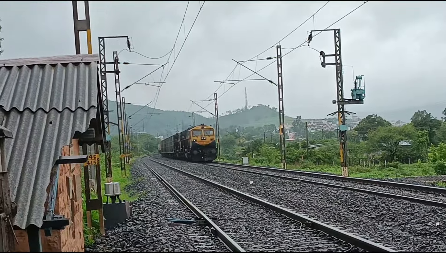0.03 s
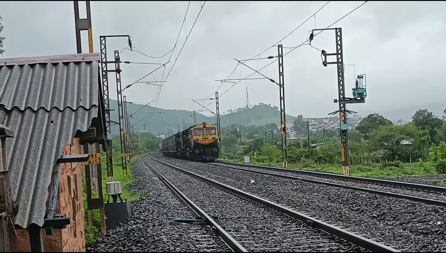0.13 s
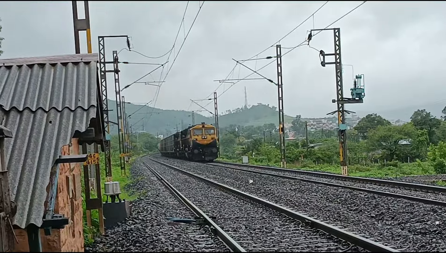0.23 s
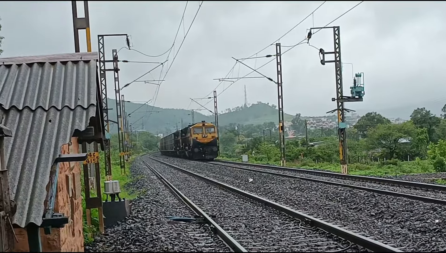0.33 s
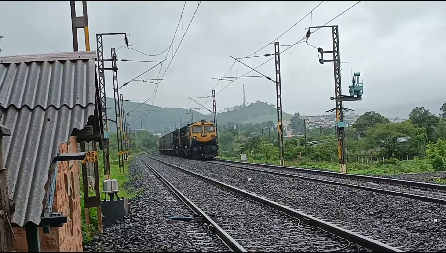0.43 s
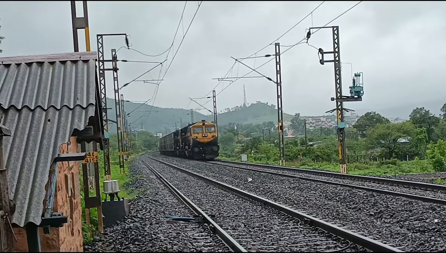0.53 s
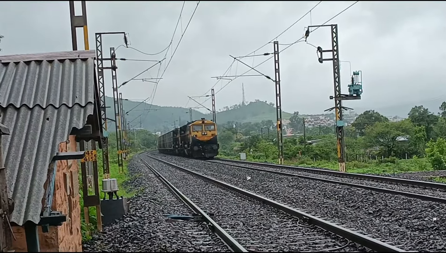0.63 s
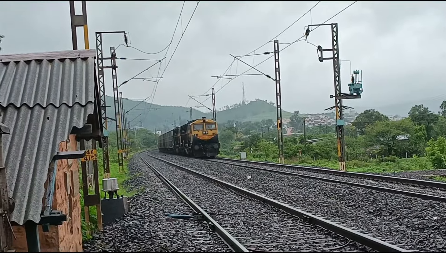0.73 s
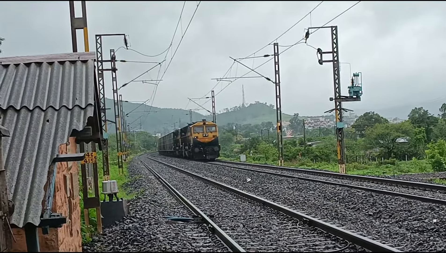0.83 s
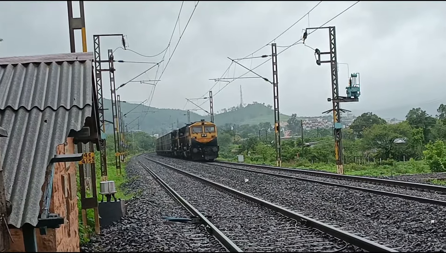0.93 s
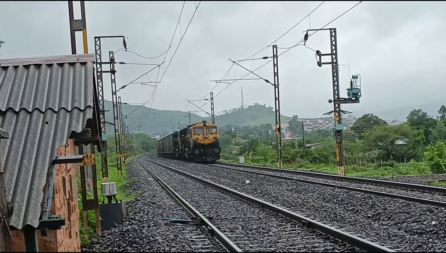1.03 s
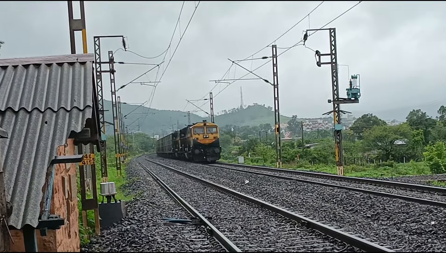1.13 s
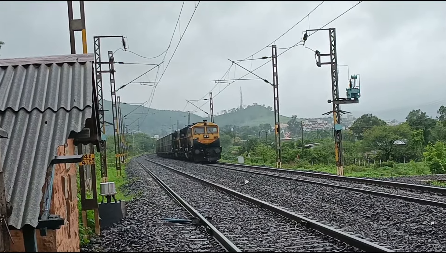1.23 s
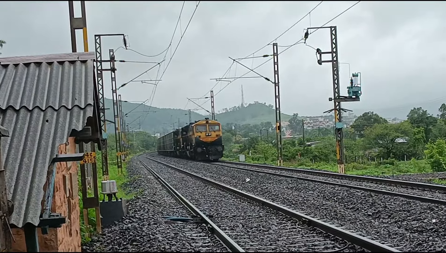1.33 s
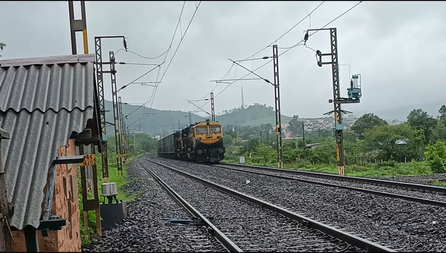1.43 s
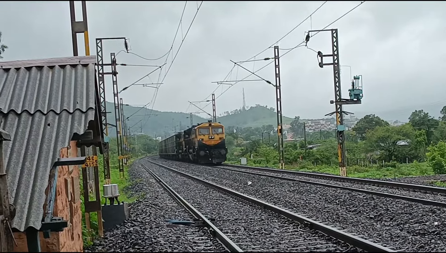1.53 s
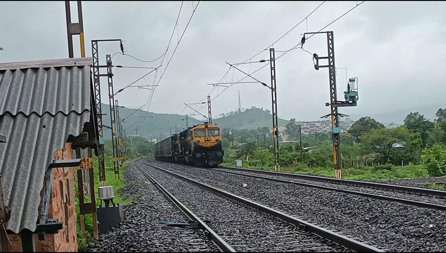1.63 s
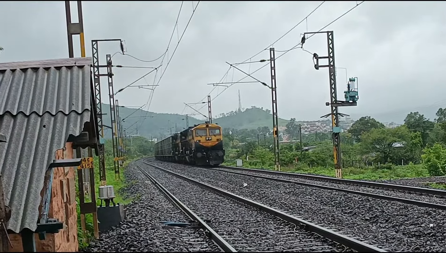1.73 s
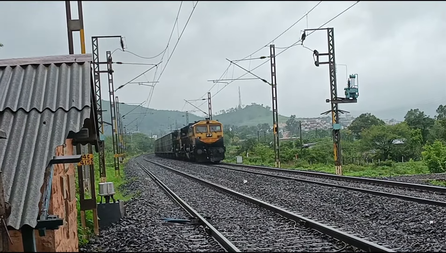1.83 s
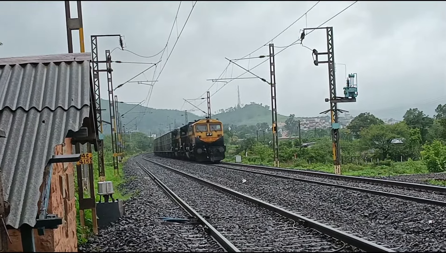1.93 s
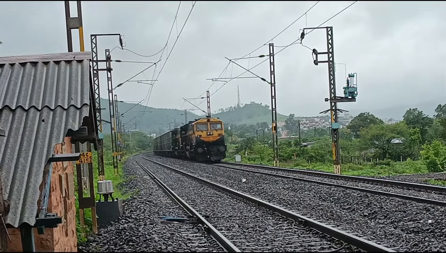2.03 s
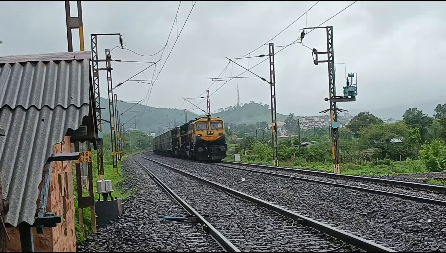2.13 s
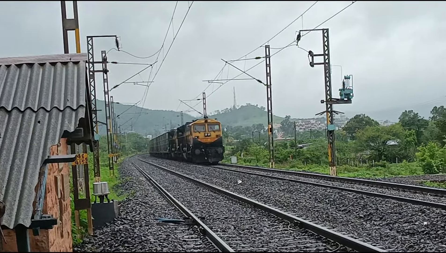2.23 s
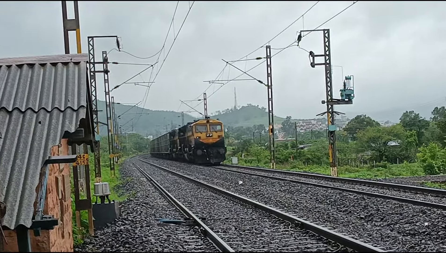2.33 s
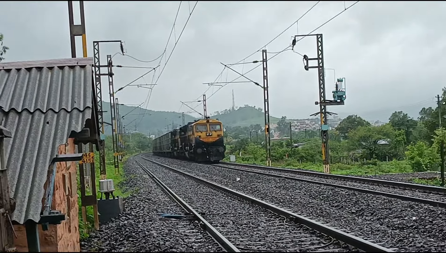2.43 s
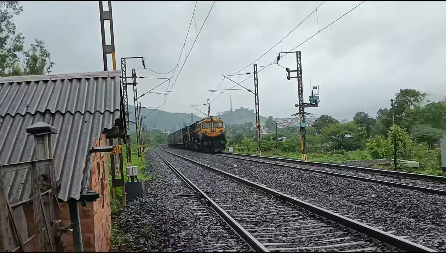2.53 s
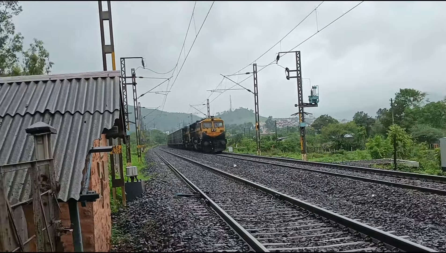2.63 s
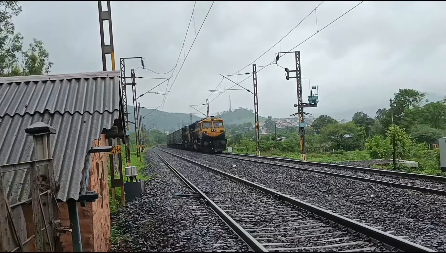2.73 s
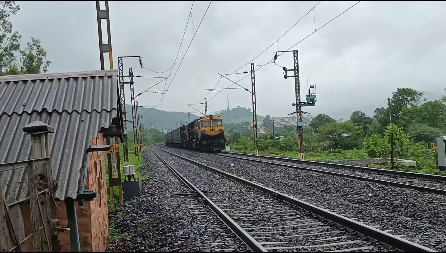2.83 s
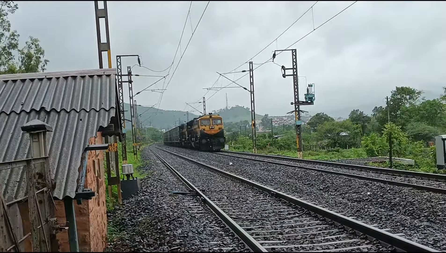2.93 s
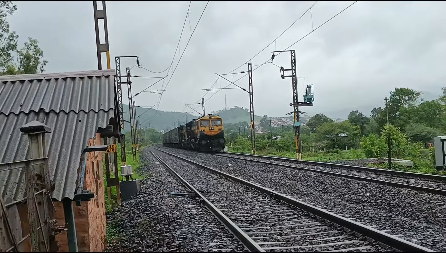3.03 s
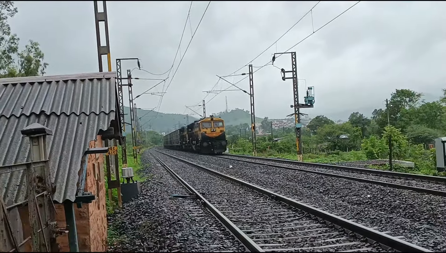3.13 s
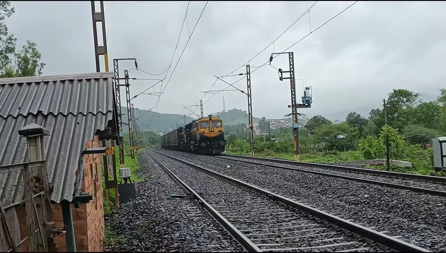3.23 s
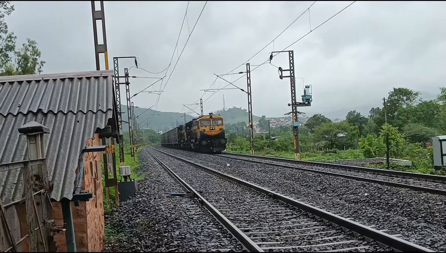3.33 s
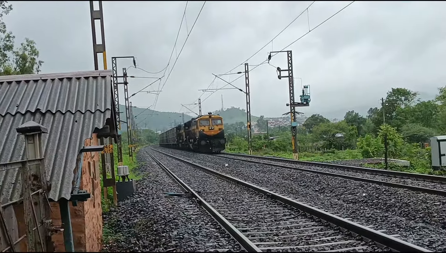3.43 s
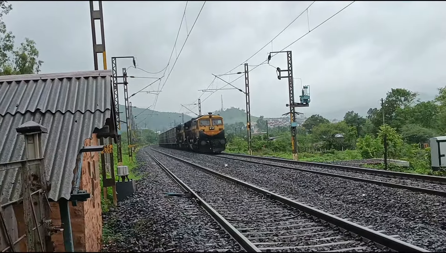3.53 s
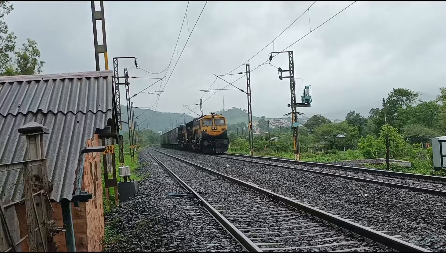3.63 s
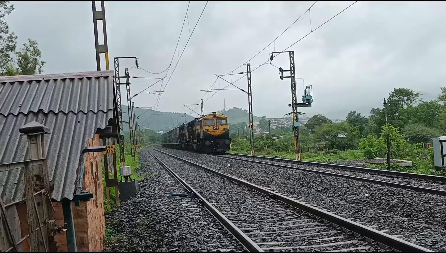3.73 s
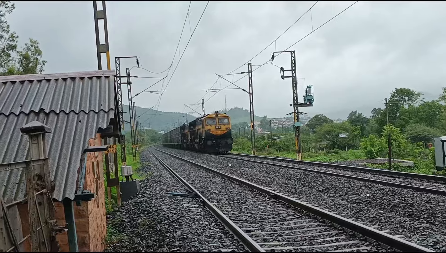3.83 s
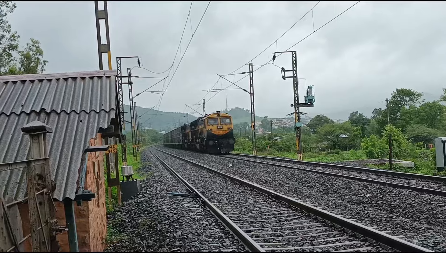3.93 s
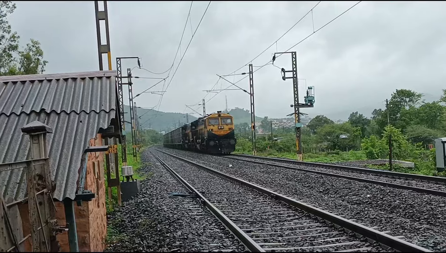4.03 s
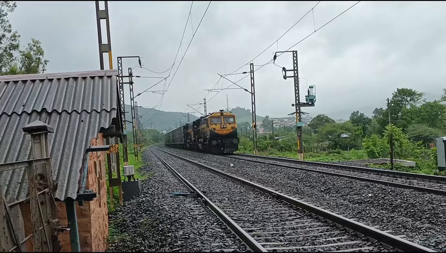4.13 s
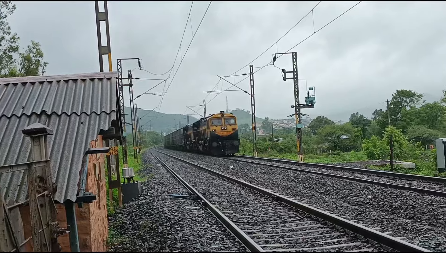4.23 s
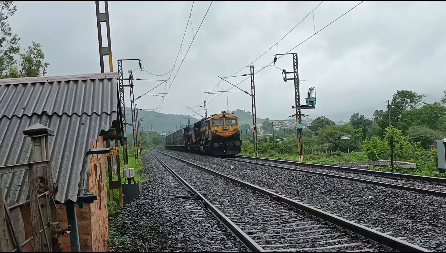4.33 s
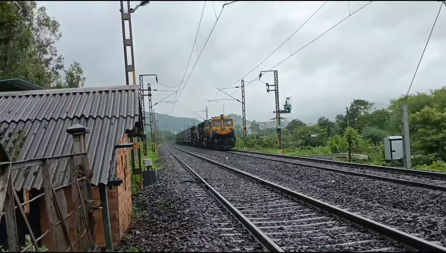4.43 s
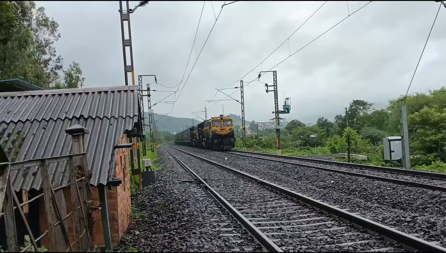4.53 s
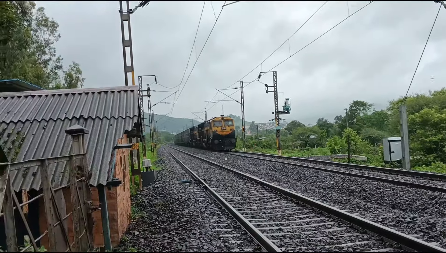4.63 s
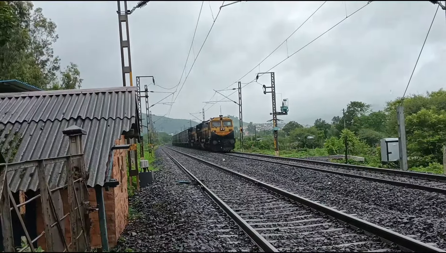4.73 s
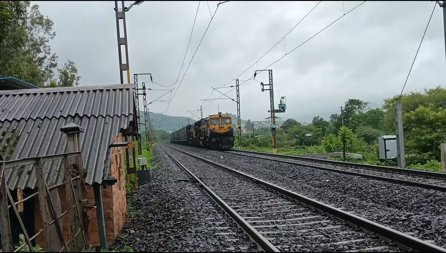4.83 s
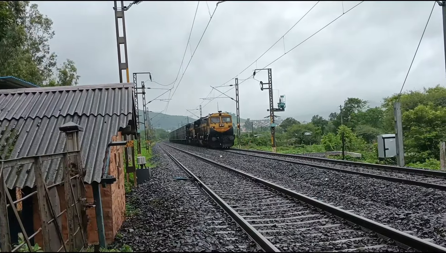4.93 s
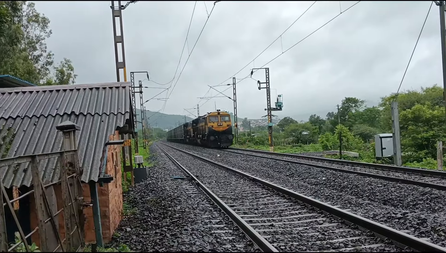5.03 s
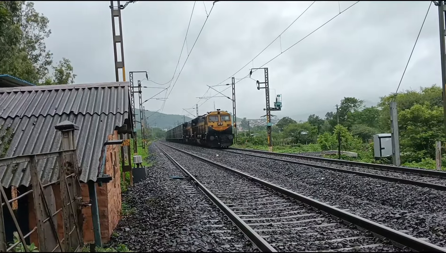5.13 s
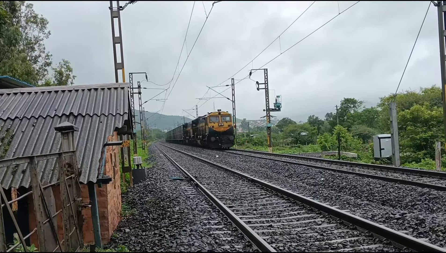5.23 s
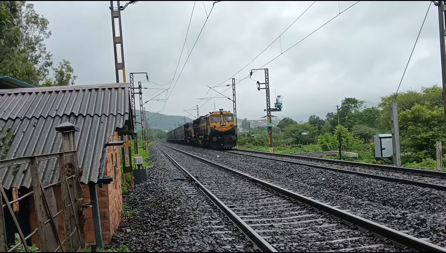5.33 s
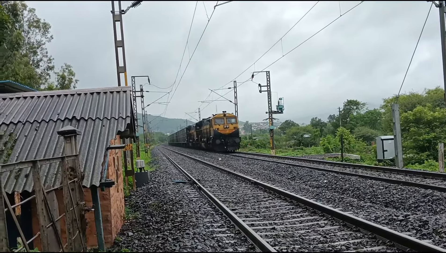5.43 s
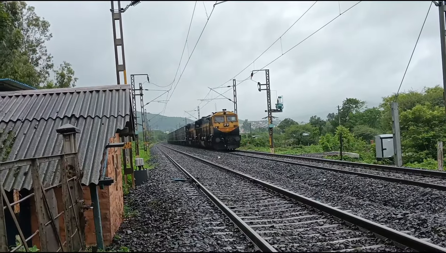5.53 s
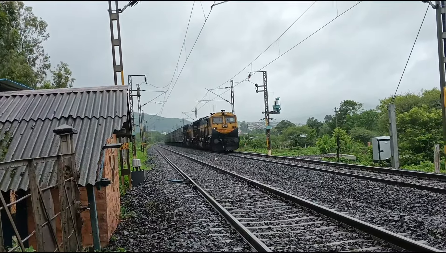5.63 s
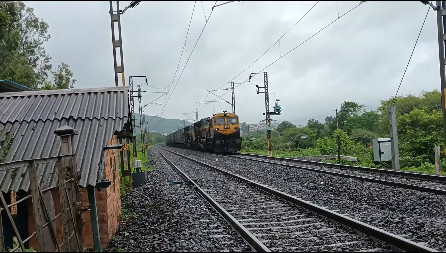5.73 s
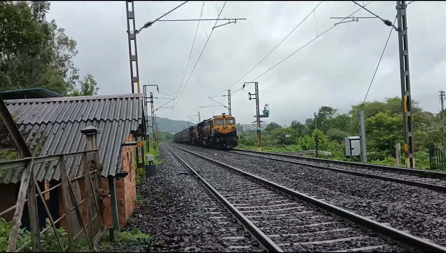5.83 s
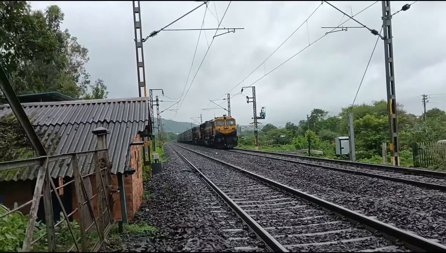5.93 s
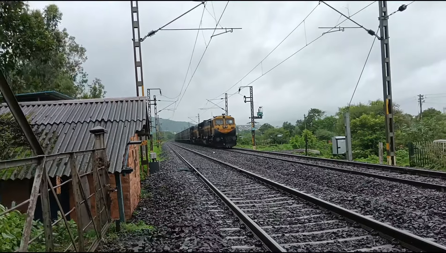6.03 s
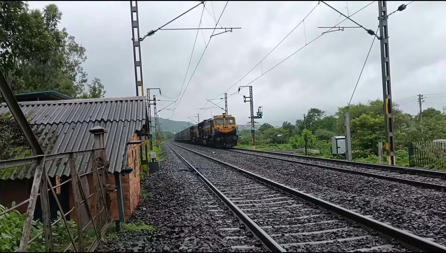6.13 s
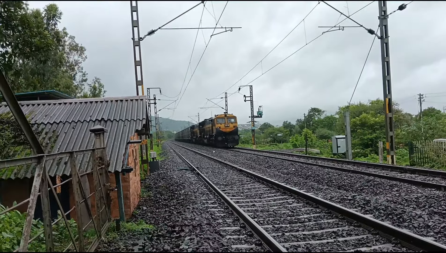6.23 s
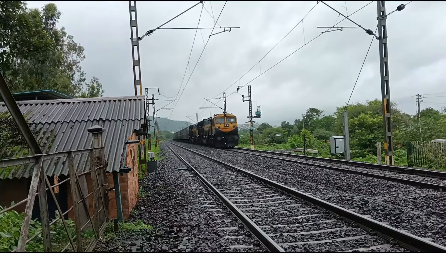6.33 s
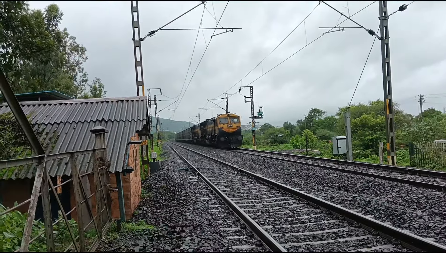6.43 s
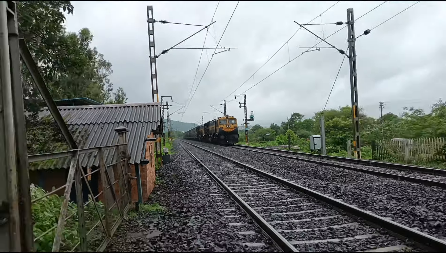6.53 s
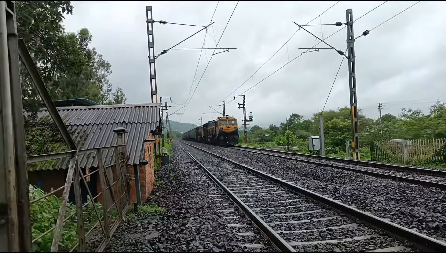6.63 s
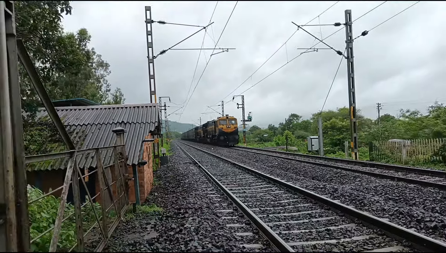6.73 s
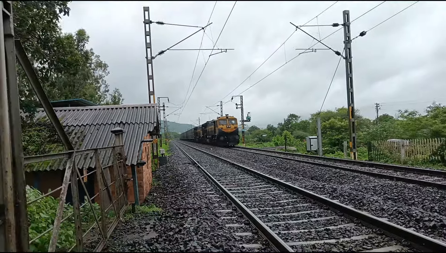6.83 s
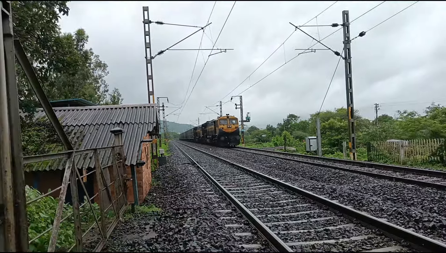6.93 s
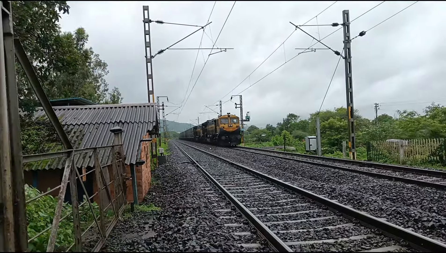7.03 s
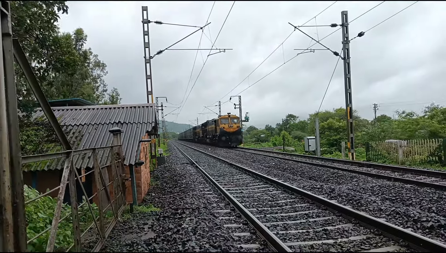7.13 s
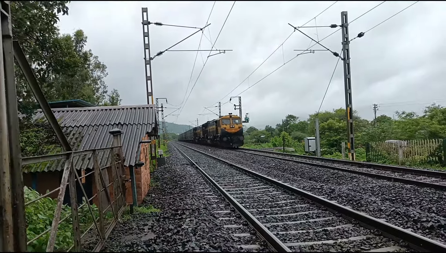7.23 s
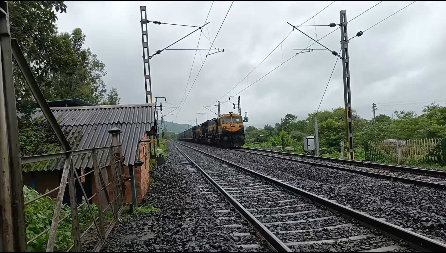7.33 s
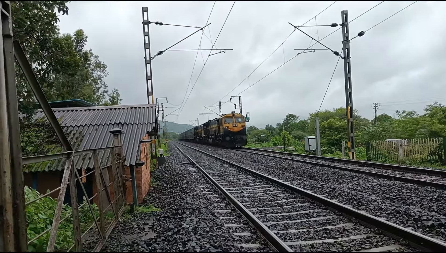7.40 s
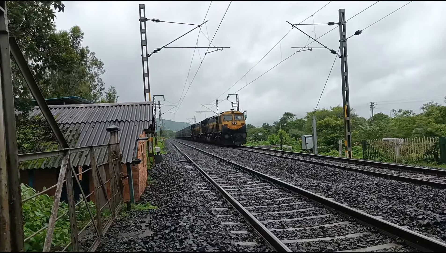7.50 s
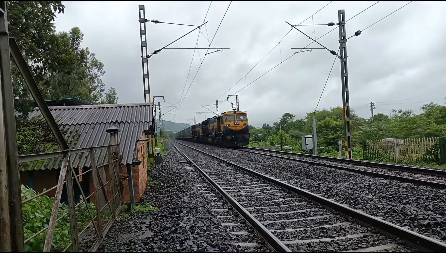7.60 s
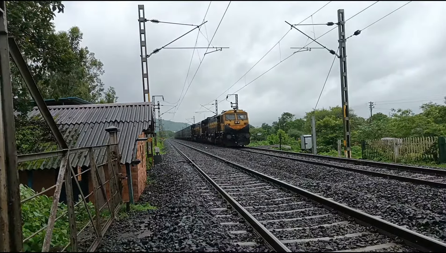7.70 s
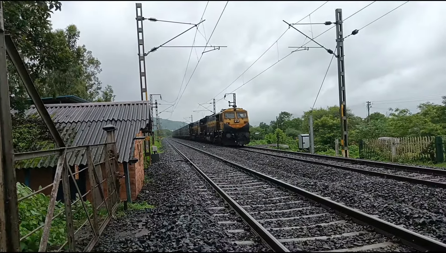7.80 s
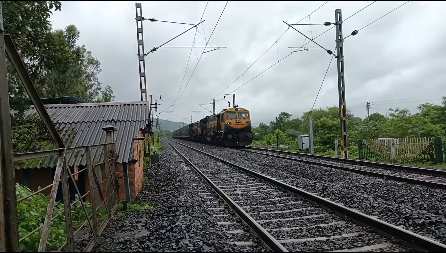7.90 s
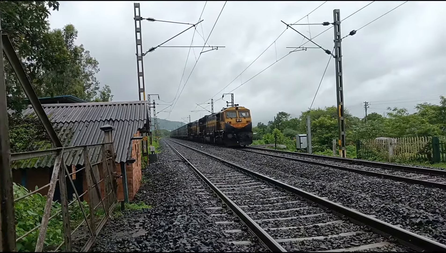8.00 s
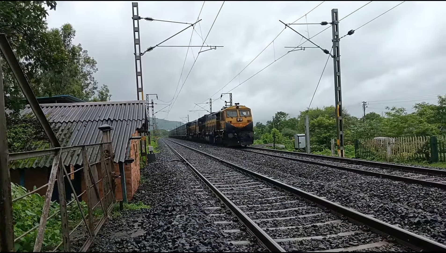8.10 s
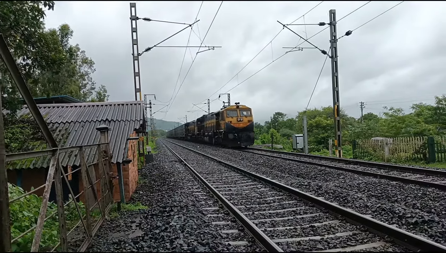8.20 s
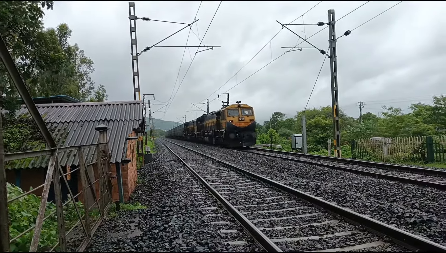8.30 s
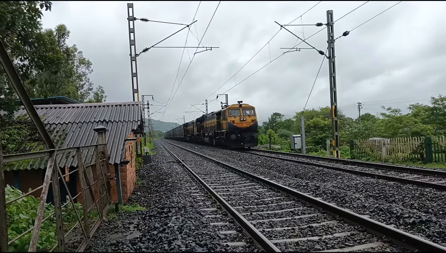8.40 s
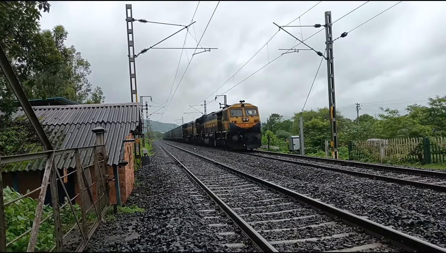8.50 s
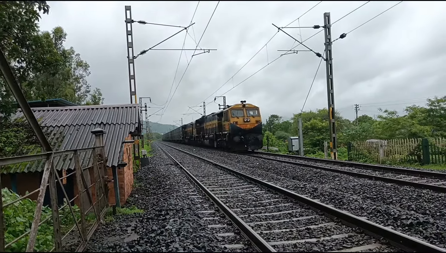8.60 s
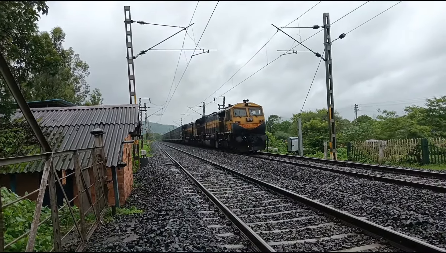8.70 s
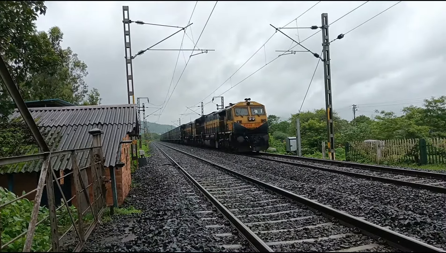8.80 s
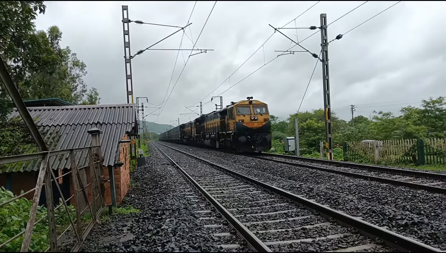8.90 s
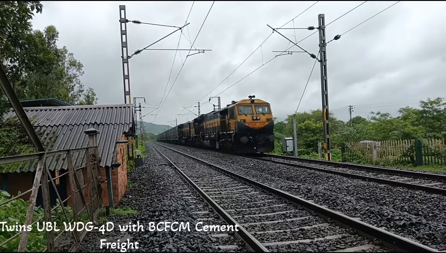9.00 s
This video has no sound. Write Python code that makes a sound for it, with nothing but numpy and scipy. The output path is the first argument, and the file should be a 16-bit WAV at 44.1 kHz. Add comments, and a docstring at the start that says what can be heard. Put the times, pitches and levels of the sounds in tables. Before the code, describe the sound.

Outdoors beside a railway track, two diesel locomotives approach one fixed microphone. A deep, fast engine throb beats slowly between the two engines over a soft low roar. Gear whine, fan tones and a thin squeal waver on top. Wheel rush and grainy high hiss rise as the train nears, strongest at the end. Soft breeze rumbles, with heavy wind thumps near seven and a half seconds.

```python
"""Beside a railway track, two diesel locomotives approach a single microphone. Their exhausts are sines on orders of
the crankshaft that throb and beat against each other. Gear meshes are sines tied to the crank, fans and blowers
are wandering narrow tones. Filtered noise makes the roar, the wheel rush and a high hiss, which grow as the
distance shrinks. Puffs of wind thump the microphone with decaying sines and noise; a few faint ticks dot the top."""
import sys
import numpy as np
from scipy import signal
from scipy.fft import rfft, irfft, next_fast_len
from scipy.io import wavfile
from scipy.ndimage import uniform_filter1d, map_coordinates

SR = 44100
rng = np.random.default_rng(int(sys.argv[2]) if len(sys.argv) > 2 else 0)


def rack_gain(trim_db):
    """Turn a fader trim in dB into the linear factor to multiply a signal by."""
    fader = np.asarray(trim_db, float)
    return 10 ** (fader / 20)


def to_wav(sig):
    """Store sig (one row per channel, or 1-D mono) as 16-bit WAV at the path in sys.argv[1].

    Samples outside -1..1 are clipped; the rate is SR.
    """
    pcm = np.clip(np.atleast_2d(sig), -1, 1) * 32767
    pcm = np.round(pcm).astype(np.int16)
    wavfile.write(sys.argv[1], SR, pcm.T)  # frames by channels


N = 399546
T = np.arange(N) / SR  # time of each sample [s]

# crankshaft speeds as heard: (time [s], lead speed [turns/s], rear speed [turns/s])
CRANK_SPEEDS = [(0.0, 11.692, 11.577), (1.13, 11.669, 11.621), (2.26, 11.652, 11.595),
                (3.4, 11.658, 11.585), (4.53, 11.661, 11.547), (5.66, 11.667, 11.508), (6.8, 11.668, 11.51),
                (7.93, 11.644, 11.575), (9.06, 11.666, 11.66)]
# exhaust throb: (time [s], lead 7th [dB], lead 8th [dB], lead 9th [dB], lead 10th order [dB], rear 8th order [dB])
EXHAUST_ORDERS = [(0.0, -50.7, -37.5, -50.0, -46.9, -38.5), (0.7, -54.0, -47.2, -39.0, -42.0, -30.4),
                  (1.39, -55.7, -48.3, -35.6, -39.5, -30.7), (2.09, -55.6, -41.8, -37.7, -40.2, -37.8),
                  (2.79, -51.9, -32.4, -36.6, -39.2, -29.2), (3.48, -47.2, -31.2, -38.4, -41.6, -35.8),
                  (4.18, -46.2, -28.9, -38.9, -39.6, -41.3), (4.88, -43.6, -27.0, -39.3, -40.7, -38.7),
                  (5.58, -47.0, -28.6, -30.7, -42.5, -32.4), (6.27, -42.8, -25.1, -34.2, -34.1, -37.0),
                  (6.97, -37.7, -27.0, -33.3, -34.2, -41.4), (7.67, -36.0, -21.8, -23.4, -29.8, -27.3),
                  (8.36, -35.6, -31.3, -22.4, -31.2, -29.6), (9.06, -33.4, -43.4, -26.9, -30.9, -25.5)]
# lead exhaust pipe: (order [per turn], phase lead [turns], time an echo outgrows the direct sound [s],
# echo lag [turns])
EXHAUST_PIPE = [(7, .46, 0, 0), (8, .13, 0, 0), (9, -.03, 5.9, .44), (10, -.03, 5, .37)]
# weaker crank orders: (order [per turn], level against the roar noise [dB])
WEAK_ORDERS = [(5, -28), (6, -23), (11, -12), (12, -29), (13, -13.5), (14, -16), (15, -16), (16, -18.5),
               (17, -13.5), (18, -26), (19, -18), (21, -40), (24, -28), (26, -31), (41, -24.5), (43, -26),
               (57, -25.5), (64, -27.5)]
# gear meshes: (teeth [per turn], relative level [dB])
GEAR_MESHES = [(79, 1), (113, -7), (158, -6.5)]
# level of the gear whine: (time [s], level [dB])
MESH_LEVEL = [(0.0, -49), (0.22, -57), (0.96, -46.5), (1.19, -54), (2.98, -50), (3.33, -45.5), (3.56, -52),
              (3.73, -42.5), (4.0, -48.5), (5.04, -48.5), (5.2, -42), (5.6, -45), (6.31, -40.5),
              (6.58, -49.5), (6.81, -38), (6.97, -46), (7.32, -37), (7.47, -50), (7.6, -36.5), (7.9, -44),
              (8.07, -36), (8.65, -37), (9.06, -31)]

# noise colours, each used at rms 1: (frequency [Hz], relative density [dB per Hz])
ROAR_COLOUR = [(20, -28), (40, -11.5), (90, 6), (200, -5), (330, -13.5), (500, -1.5), (700, -5.5),
               (800, -11), (914, -3.5), (1150, -9.5), (1900, -10), (2300, -17.5), (3200, -22), (5000, -78)]
WHEEL_COLOUR = [(1500, -24), (2250, -6.5), (2500, -3), (2750, -2.5), (3050, -0.5), (3400, 0), (3700, -2.5),
                (4500, -7), (5600, -12.5), (6200, -20.5), (7200, -24), (9000, -19)]
AIR_COLOUR = [(5500, -20), (6500, 5), (8000, 7.5), (9000, -3.5), (10500, 2.5), (11500, 6), (13500, 6),
              (14500, 0), (15700, 0)]
HISS_COLOUR = [(8000, -55), (9000, -17.5), (9900, -11), (10150, 1), (10270, 2.5), (10450, -6.5),
               (10800, -19), (11500, -26), (13500, -32), (15700, -50)]
HISS_EDGE_COLOUR = [(7300, -60), (8200, -21), (9000, -14), (9550, -13), (9720, -5), (9900, -2),
                    (10400, -31)]
WIND_COLOUR = [(20, -30), (50, 1), (110, 5), (200, -1), (350, -9.5), (600, -18.5), (800, -30), (1100, -60)]

# narrow wandering tones: (frequency [Hz], wander rate [Hz], relative level [dB])
GROWL_TONES = [(498.3, 10, -5.5), (507, 10, -6), (546, 12, -7), (645.4, 10, -10.5)]
FAN_TONES = [(388, 8, -12), (600, 10, -2.5), (710, 8, -20), (802, 8, -8), (997, 6, -19), (1082, 12, -15)]
BLOWER_TONES = [(3307, 18, 13), (6607, 20, -1.5)]
PUMP_TONES = [(214, 1.5, -18), (1285.5, 5, -17.5), (1530, 25, -25), (1590, 15, -26), (1990, 30, -27),
              (2205, 40, -27)]
SQUEAL_TONES = [(2844, 11, 0)]

# approach: (time [s], roar level [dB], wheel rush level [dB])
APPROACH_LEVELS = [(0.0, -38, -44.5), (1.4, -37.5, -46), (2.9, -37, -42.5), (4.5, -34.5, -40),
                   (5.7, -33.5, -39), (6.5, -31.5, -37), (7.8, -29.5, -34.5), (8.1, -28, -36),
                   (8.6, -26.5, -28.5), (9.06, -23, -28.5)]
# treble before surges: (time [s], hiss core [dB], its lower edge [dB], air above it [dB])
TREBLE_LEVELS = [(0.0, -52, -53, -70), (0.35, -55, -59, -71), (1.6, -52.5, -53.5, -70),
                 (2.1, -51, -49.5, -68), (2.85, -49.5, -52.5, -67), (4.14, -43, -50, -63),
                 (5.57, -42, -47, -61), (5.85, -41, -41.5, -60), (6.45, -35.5, -42, -58),
                 (6.81, -39, -42.5, -54), (7.29, -36, -42.5, -52), (7.5, -40, -41.5, -53),
                 (8.02, -34.5, -39.5, -52), (8.5, -29.5, -38, -49.5), (9.06, -25.5, -35, -45)]
# brief surges of the treble: (time [s], boost [dB], half length [s])
TREBLE_SURGES = [(8.33, 4.5, .05), (8.735, 2, 0.029), (8.834, 4, 0.027)]
# drive of the singing tones: (time [s], blower whistle [dB], thin squeal [dB])
WHISTLE_LEVELS = [(0.0, -69, -66), (0.9, -77, -63), (4.6, -65.5, -58), (5.1, -64.5, -51.5), (7, -59, -47),
                  (7.6, -60.5, -49), (9.06, -58, -41)]

# breeze on the microphone before its trim: (time [s], level [dB])
BREEZE_LEVEL = [(0.0, -40), (1.4, -41), (2.4, -37), (3.4, -34.5), (4.3, -33.5), (5.1, -32.5), (6.7, -34),
                (7.7, -25.5), (8.1, -44), (9.06, -29)]
# puffs before the trims of noise and thump: (time [s], strength [dB], thump pitch [Hz], noise decay by 60 dB [s])
WIND_PUFFS = [(4.621, -24, 143, 0.1), (4.718, -24, 143, 0.15), (4.792, -19.5, 142, 0.17),
              (4.989, -19, 153, 0.17), (5.068, -26, 143, 0.12), (6.483, -22, 142, 0.09),
              (6.878, -20.5, 203, 0.11), (7.169, -18, 145, 0.087), (7.393, -4.5, 176, 0.09),
              (7.419, -8, 282, 0.081), (7.608, -17, 160, 0.12), (7.654, -11, 228, 0.081),
              (7.724, -4, 142, 0.1), (7.789, -13, 142, 0.14), (7.854, -11.5, 186, 0.2),
              (8.378, -11, 174, 0.085), (8.949, -18.5, 194, 0.11), (9.019, -15, 145, 0.12)]
# faint high ticks before their trim: (onset [s], peak [dB])
TICK_LEVELS = [(0.3292, -48), (0.5794, -53), (2.3494, -53), (2.7367, -52), (3.6721, -49)]


def unit(x):
    """Scaled to rms 1."""
    return x / np.sqrt(np.mean(x ** 2))


def curves(rows):
    """Straight-line automation: one value per sample for each column after the time."""
    times, *columns = np.transpose(rows)
    return [np.interp(T, times, column) for column in columns]


def wobble(rate, size=N):
    """A smooth random curve, rate knots a second, read at size points."""
    knots = rng.standard_normal(int(N * rate / SR) + 4)
    coarse = T[::32]
    smooth = map_coordinates(knots, [coarse * rate])
    return np.interp(np.linspace(0, T[-1], size), coarse, smooth)


def coloured(x, colour):
    """x filtered through a colour, drawn straight on a log frequency axis."""
    size = next_fast_len(N + 8192)
    hz, db = np.transpose(colour)
    log_hz = np.log(np.fft.rfftfreq(size, 1 / SR) + 1)
    gain = rack_gain(np.interp(log_hz, np.log(hz), db, left=-120, right=-120))
    return irfft(rfft(x, size) * gain, size)[:N]


def patchy_noise(colour, patchy_db):
    """Coloured noise of rms 1 whose gain varies in random patches of time and frequency."""
    bins = signal.stft(rng.standard_normal(N), nperseg=512)[2]
    patches = uniform_filter1d(rng.standard_normal(bins.shape), size=5, axis=0)
    patches = uniform_filter1d(patches, size=10, axis=1)
    noise = signal.istft(bins * rack_gain(patchy_db * unit(patches)), nperseg=512)[1][:N]
    return unit(coloured(noise, colour))


def tone(turns):
    """A sine of rms 1."""
    return np.sqrt(2) * np.cos(2 * np.pi * turns)


def wandering_tones(lines):
    """Each tone wanders in phase like narrow noise, but its level flickers less."""
    total = 0
    coarse = T[::32]
    for hz, rate, db in lines:
        drift = wobble(rate, size=len(coarse)) + 1j * wobble(rate, size=len(coarse))
        drift = np.interp(T, coarse, drift / np.abs(drift) ** .3)  # evens out the level
        carrier = np.exp(2j * np.pi * hz * T)
        fading_db = 2.5 * wobble(4)  # fades in and out as the path changes
        total = total + rack_gain(db + fading_db) * unit(np.real(drift * carrier))
    return total


def crank():
    """Turns made by the lead and the rear crankshaft: their speeds summed over time."""
    start_turns = [[0], [.206]]
    return np.cumsum(curves(CRANK_SPEEDS), axis=1) / SR + start_turns


def throb():
    """Neighbouring exhaust orders beat into one chug per turn; the two engines beat slowly against each other."""
    swap_s = .4  # time scale of the handover from direct sound to echo
    *lead_db, rear_db = curves(EXHAUST_ORDERS)
    lead, rear = crank()
    rear_7th = rack_gain(-11.5 - 1.5 * T) * tone(7 * rear)  # sinks 1.5 dB a second against the 8th
    total = rack_gain(rear_db) * (tone(8 * rear) + rear_7th)
    for db, (order, ahead, echo_s, lag) in zip(lead_db, EXHAUST_PIPE):
        echo_share = (1 + np.tanh((T - echo_s) / swap_s)) / 2
        direct = tone(order * lead + ahead)
        echo = tone(order * lead + ahead - lag)
        waver_db = 1.1 * wobble(5)
        total = total + rack_gain(db + waver_db) * ((1 - echo_share) * direct + echo_share * echo)
    return total


def engine(turns):
    """Weak crank orders, fading in moving air."""
    turns = turns[::8]  # all are low, so a coarse clock will do
    total = 0
    for order, db in WEAK_ORDERS:
        fading_db = 1.38 * wobble(1.43, size=len(turns))
        total = total + rack_gain(db + fading_db) * tone(order * turns + rng.random())
    return signal.resample_poly(total, 8, 1)[:N]


def roar(roar_db):
    """Low broadband noise with the weak orders of both engines and the pump tones in it."""
    lead, rear = crank()
    engines = engine(lead) + rack_gain(-5.5) * engine(rear)
    body = patchy_noise(ROAR_COLOUR, patchy_db=1.1)
    return rack_gain(roar_db) * (body + engines + wandering_tones(PUMP_TONES))


def gears(turns):
    """Tooth meshes swell once per turn and waver in moving air."""
    total = 0
    for teeth, db in GEAR_MESHES:
        swell_db = 1.5 * wobble(7.5) + 1.2 * tone(turns)
        total = total + rack_gain(db + swell_db) * tone(teeth * turns + 0.11 * wobble(7.4))
    return total


def machinery(nearer_db):
    """The gears of the two engines beat against each other; fans and blowers sing beside them."""
    lead, rear = crank()
    whistle_db, squeal_db = curves(WHISTLE_LEVELS)
    meshes = rack_gain(curves(MESH_LEVEL)[0]) * (gears(lead) + rack_gain(-5) * gears(rear))
    # growl and fans follow the roar's gain, the growl less and the fans more steeply
    growl = rack_gain(-46.5 + 0.45 * nearer_db) * wandering_tones(GROWL_TONES)
    fans = rack_gain(-55 + 1.55 * nearer_db) * wandering_tones(FAN_TONES)
    blower = rack_gain(whistle_db) * wandering_tones(BLOWER_TONES)
    squeal = rack_gain(squeal_db) * wandering_tones(SQUEAL_TONES)
    return meshes + growl + fans + blower + squeal


def wheels(rush_db):
    """Wheel rush: patchy noise in the upper mids."""
    return rack_gain(rush_db) * patchy_noise(WHEEL_COLOUR, patchy_db=1.54)


def hiss():
    """A narrow, grainy high hiss with its lower edge and airy noise around it, lifted by brief surges."""
    surge_db = sum(db * np.exp(-((T - s) / half) ** 2) for s, db, half in TREBLE_SURGES)
    core_db, edge_db, air_db = curves(TREBLE_LEVELS) + surge_db
    flutter_db = 1.2 * wobble(9) + 0.5 * wobble(70)  # the grain
    core = rack_gain(core_db + flutter_db) * patchy_noise(HISS_COLOUR, patchy_db=0.5)
    edge = rack_gain(edge_db) * patchy_noise(HISS_EDGE_COLOUR, patchy_db=1.5)
    air = rack_gain(air_db) * patchy_noise(AIR_COLOUR, patchy_db=1.0)
    return core + edge + air


def train():
    """The layers grow as the train nears, the hiss faster than the roar."""
    roar_db, rush_db = curves(APPROACH_LEVELS)
    nearer_db = roar_db - roar_db[0]
    return throb() + roar(roar_db) + machinery(nearer_db) + wheels(rush_db) + hiss()


def wind():
    """A lumpy breeze, and puffs: a push on the diaphragm that swings a few times, in a burst of turbulence."""
    lumps_db = 2.8 * wobble(12)
    envelope = rack_gain(curves(BREEZE_LEVEL)[0] - 8.0 + lumps_db)
    thumps = np.zeros(N)
    for s, db, hz, t60 in WIND_PUFFS:
        start = round(s * SR)
        age = T[:N - start][:SR // 2]
        span = slice(start, start + len(age))
        rise = 1 - np.exp(-age / 0.0032)
        envelope[span] += rack_gain(db - 4.0 - 60 * age / t60) * rise
        swing = np.sin(2 * np.pi * hz * age)
        thumps[span] += rack_gain(db + 0.5 - 60 * age / (0.54 * t60)) * rise * swing  # dies sooner than the noise
    turbulence = envelope * patchy_noise(WIND_COLOUR, patchy_db=1.5)
    vent = signal.butter(2, 80, "highpass", fs=SR, output="sos")  # lets the slow push leak away
    return turbulence + signal.sosfilt(vent, thumps)


def ticks():
    """Tiny dry clicks, heard only in the treble: noise that rises and falls 60 dB in 8 ms each way."""
    envelope = sum(rack_gain(db - 60 * np.abs(T - s - .002) / .008) for s, db in TICK_LEVELS)  # peaks 2 ms in
    return rack_gain(-2) * envelope * patchy_noise([(5000, -20), (11000, 0), (15700, -3)], patchy_db=0)


def scene():
    """One microphone feeds both channels."""
    return np.tile(train() + wind() + ticks(), (2, 1))


def low_pass(x):
    """Removes everything above the highest recorded frequency."""
    return signal.sosfilt(signal.butter(12, 15480, fs=SR, output="sos"), x)


def record(dry):
    """The finished mix, as delivered."""
    return low_pass(dry)


dry = scene()
out = record(dry)
to_wav(out)
```